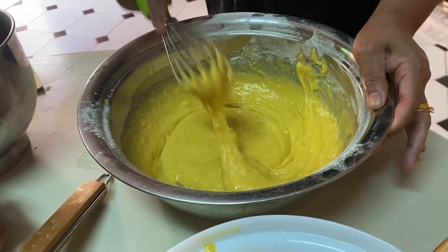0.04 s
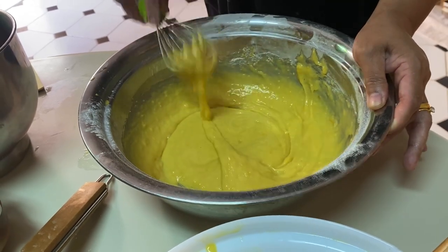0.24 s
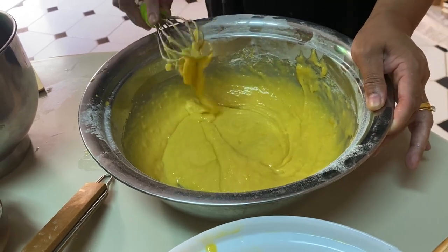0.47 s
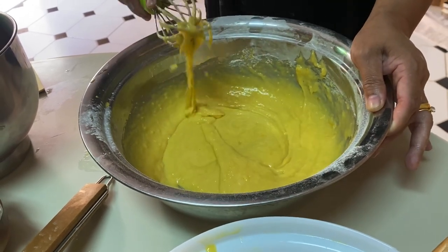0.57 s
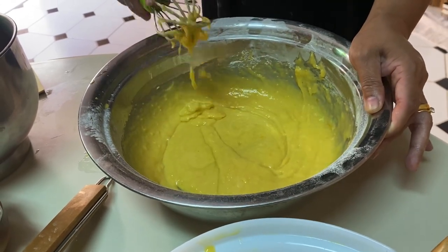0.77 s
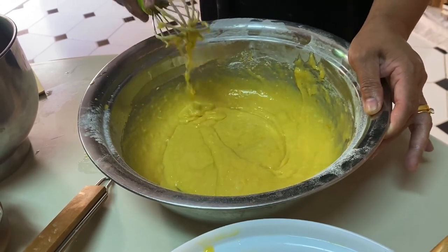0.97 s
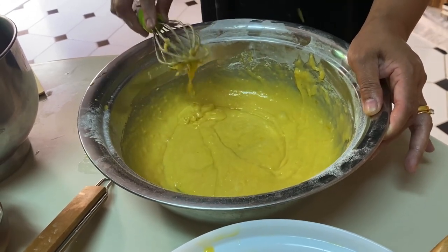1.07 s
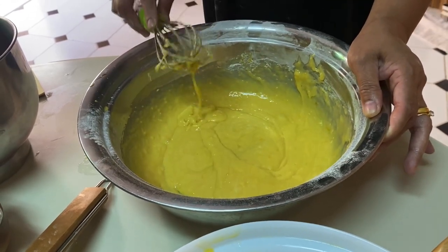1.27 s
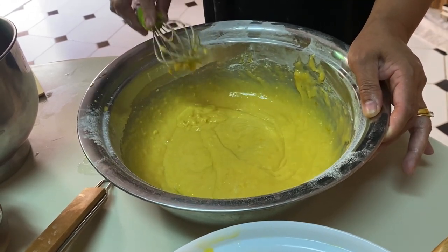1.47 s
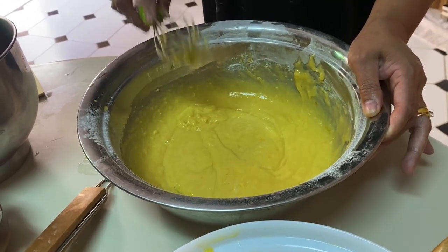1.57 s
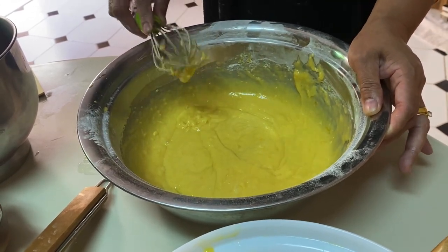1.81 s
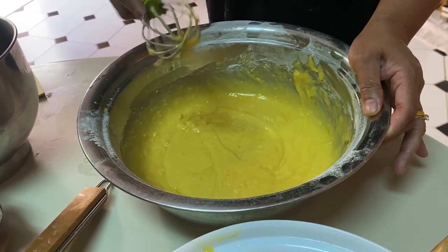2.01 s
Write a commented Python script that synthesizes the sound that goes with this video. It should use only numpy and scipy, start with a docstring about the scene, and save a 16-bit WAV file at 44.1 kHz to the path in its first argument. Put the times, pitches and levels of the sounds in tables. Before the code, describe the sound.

A wire whisk taps nine times on a steel mixing bowl's rim, evenly, in a kitchen

```python
"""A quiet hum, coloured noise, is heard first; then a wire whisk is tapped nine times on the rim of a steel
mixing bowl to shake off batter. Each tap is a short chatter of wires, made of decaying noise bursts, over a
longer noise wash of rattling wires. It rings the damped bowl and thumps the worktop, both sums of decaying
modes, and a hard kitchen answers by convolution with a noise tail whose decay depends on frequency."""
import sys
import numpy as np
from scipy import signal
from scipy.fft import rfft, irfft, next_fast_len
from scipy.io import wavfile

SR = 44100
rng = np.random.default_rng(int(sys.argv[2]) if len(sys.argv) > 2 else 0)


def log_audio(samples):
    """Write samples as a 16-bit WAV file to the path given in sys.argv[1]."""
    # one column per channel
    frames = np.atleast_2d(samples).T
    # limit to full scale, then quantise
    limited = np.clip(frames, -1, 1)
    pcm = np.round(limited * 32767).astype(np.int16)
    wavfile.write(sys.argv[1], SR, pcm)


N = 90404

# Steady hum spectrum: (frequency [Hz], relative density [dB per Hz])
HUM_SPECTRUM = [(15, -42), (25, -38), (48, -7), (144, -14), (177, -3), (344, -22.5), (584, -15), (666, -25),
                (741, -19), (1440, -28.5), (4850, -39), (8930, -48), (14000, -49)]
HUM_DB = -57.5

# Taps: (time [s], chatter level [dB], worktop thump level [dB], worktop knock level [dB], bowl body level [dB],
# rim levels near 3, 4, 5 and 7 kHz [dB], four columns, added left-over-right level [dB])
TAPS = [(0.1993, -13.5, -23, -30, -24, -26, -25.5, -34, -25, 0.53),
        (0.389, -15.5, -24, -29.5, -25, -22.5, -28.5, -49, -51, 0.71),
        (0.5786, -15, -23.5, -27.5, -23.5, -24.5, -31, -37, -25.5, 0.66),
        (0.7795, -19.5, -22, -23, -20, -20, -27, -33, -20, 0.77),
        (0.9749, -17, -24, -24.5, -21, -21, -24.5, -34, -30, 1),
        (1.17, -21, -23, -28.5, -19, -18, -20, -27, -33, 0.92),
        (1.3519, -15.5, -25, -29.5, -24.5, -21.5, -27, -39, -30, 0.82),
        (1.5473, -18, -22.5, -28, -19, -21, -27, -26, -36, 1.2),
        (1.7214, -17, -23, -29, -23.5, -17, -23, -34.5, -20, 0.75)]

# Wires landing on the rim: (frequency [Hz], relative density [dB per Hz])
CHATTER_SPECTRUM = [(500, -37), (1500, -16), (2100, -11), (3400, -18), (4500, -17), (5500, -4), (6500, -10),
                    (8000, -7), (12000, -7.5), (15000, 0.5), (16300, -17.5), (17300, -37)]
CHATTER_RISE_S, CHATTER_HOLD_S, CHATTER_T60_S = 0.00047, 0.0055, 0.032
WIRES, WIRE_T60_S = 7, 0.0048  # landings in a tap, decay of each
WIRE_SCATTER_DB = 6.5  # landings lie between zero and twice this below full level

# Wires rattling on: (frequency [Hz], relative density [dB per Hz])
QUIVER_SPECTRUM = [(600, -21), (1200, 0), (2000, 1.5), (2700, -3), (3400, -2), (4500, -2.5), (6300, -3),
                   (8500, -8.5), (12000, -9), (17000, -31)]
QUIVER_DB, QUIVER_T60_S, QUIVER_RISE_S = -18, 0.42, 0.0021  # level relative to the chatter

# Modes of the bowl's rim near 3, 4, 5 and 7 kHz, then of its body:
# (frequency [Hz], relative level [dB], 60 dB decay time [s], first swing [1 or -1])
RIM_3K = [(2275, -17, .15, 1), (2390, -8, .035, -1), (2995, 0, .04, 1), (2980, -21, .6, -1)]
RIM_4K = [(3826, -2, 0.051, -1), (3822, 2.5, 0.018, 1), (3820, -13, 0.15, -1), (4336, -17.5, 0.029, 1)]
RIM_5K = [(4840, -2.5, 0.096, -1), (4815, -11, 0.39, 1), (5650, -5.5, 0.069, 1), (5610, -11.5, 0.047, -1)]
RIM_7K = [(6300, -6, .03, -1), (7040, 2, .028, 1), (7600, -6, .025, -1), (7950, -8, .025, 1)]
BODY = [(904, -3.5, 0.052, 1), (1048.5, 2.5, 0.036, -1), (1220.6, -14.5, 0.34, 1), (1403, 8.5, 0.02, -1),
        (1540, -3.5, 0.067, 1), (1990, -46, 0.045, -1)]
RIM_LAG_S, BODY_LAG_S = 0.000875, 0.001585
BOWL_RISE_S = 0.00046  # the bowl swells while the wires land
BLUR_HZ = 17.3  # batter and the hand blur the bowl's modes
BOWL_WET_DB = -2.5  # the bowl's ring reaches the walls weaker than the chatter

# Modes of the worktop: knock, then thump, then low boom, each listed from low to high:
# (frequency [Hz], relative level [dB], 60 dB decay time [s], first swing [1 or -1])
KNOCK = [(276.4, -4, 0.21, 1), (324.2, 10.5, 0.066, -1), (451, 15.5, 0.023, -1), (505.5, -9.5, 0.16, -1),
         (541, -0.5, 0.22, 1), (620, 9, 0.041, -1), (804.7, -3, 0.043, 1)]
THUMP = [(116.3, -12, 0.52, 1), (133.6, -1, .1, 1), (171.6, -11, 0.31, 1), (198.6, -5.5, 0.21, 1),
         (247.5, -1, 0.12, -1)]
BOOM = [(48.7, -12.5, 0.72, 1), (64.1, -7, 0.32, 1), (76.7, -8.5, 0.24, -1)]
KNOCK_LAG_S, THUMP_LAG_S, BOOM_LAG_S = 0.00525, 0.00545, 0.012  # the push takes time to reach the worktop

SCATTER_DB = 1.5  # standard deviation of mode levels from tap to tap
RISE_CYCLES = 0.45  # each mode's build-up time constant, in its own cycles

# Reverberation: (frequency [Hz], 60 dB decay time [s])
ROOM_T60 = [(100, 0.55), (300, 0.52), (800, 0.56), (2000, 0.72), (5000, 0.6), (9000, 0.41), (14000, 0.3)]
# Reverberation strength: (frequency [Hz], tail over direct level [dB])
ROOM_LEVEL = [(60, -26), (200, -9.5), (600, -4), (1500, -3.5), (3000, -7.5), (6000, -4.5), (10000, -11.5),
              (16000, -14)]
ROOM_DELAY_S = 0.004

# Likeness of left and right: (frequency [Hz], correlation [0 to 1])
ALIKE = [(60, 1), (300, 0.81), (700, 0.17), (1400, .15), (3000, 0.81), (6000, 0.13), (8000, 1),
         (15000, 0.93)]
# Phase between left and right: (frequency [Hz], left lead [rad])
LEFT_LEADS = [(100, 0), (6850, 0), (9000, -3.14), (11000, -6.1), (13300, -9.42), (15500, -12.6),
              (17300, -15.2)]
# Level between left and right: (frequency [Hz], left over right level [dB])
LEFT_LEVEL = [(100, -1.5), (400, -1.1), (700, 1.5), (1500, 0.7), (2300, 1.5), (3000, 6.5), (3900, 2),
              (6000, -1.7), (16000, -0.5)]
TOP_HZ = 17350


def amp(db):
    """Level law: every 20 dB is a tenfold gain."""
    return 10 ** (np.asarray(db) / 20)


def along(points, hz):
    """Interpolation of (frequency, value) points on a logarithmic frequency axis."""
    f, v = np.transpose(points)
    return np.interp(np.log(hz + 1), np.log(f + 1), v)


def filtered(x, response):
    """Linear filtering: the spectrum is multiplied by a complex frequency response."""
    m = next_fast_len(x.shape[-1] + 8192)
    spectrum = rfft(x, m) * response(np.fft.rfftfreq(m, 1 / SR))
    return irfft(spectrum, m)[..., :x.shape[-1]]


def coloured(spectrum, size):
    """Spectral shaping of white noise: two unrelated signals with a joint rms of 1."""
    white = rng.standard_normal((2, size))
    x = filtered(white, lambda hz: amp(along(spectrum, hz)))
    return x / np.sqrt(np.mean(x ** 2))


def stereo(pair):
    """Stereo width: mixing two unrelated versions sets how alike left and right are in each band."""
    def mix(hz):
        turn = np.arccos(np.clip(along(ALIKE, hz), 0, 1)) / 2
        return np.array([np.cos(turn), np.sin(turn)])

    def tilt(hz):
        half_level = amp(along(LEFT_LEVEL, hz) / 2)
        half_lead = np.exp(0.5j * along(LEFT_LEADS, hz))
        return half_level * half_lead

    shared, opposed = filtered(pair, mix)
    left_right = np.array([shared + opposed, shared - opposed])
    return filtered(left_right, lambda hz: np.array([tilt(hz), 1 / tilt(hz)]))


def hum():
    """Stationary noise: a fixed spectrum at a constant low level."""
    return amp(HUM_DB) * stereo(coloured(HUM_SPECTRUM, size=N))


def chatter(t):
    """Impact succession: the wires land one after another within a few milliseconds, each a decaying burst."""
    draw = rng.random((WIRES, 2))
    landing = CHATTER_HOLD_S * (np.arange(WIRES)[:, None] + draw[:, :1]) / WIRES
    age = t - landing
    strength_db = WIRE_SCATTER_DB * 2 * (draw[:, 1:] - 1)
    ticks = amp(strength_db - 60 * np.abs(age) / WIRE_T60_S) * (age > 0)
    wash = amp(-9 - 60 * t / CHATTER_T60_S)
    rise = 1 - np.exp(-t / CHATTER_RISE_S)
    return rise * (ticks.sum(0) + wash) * coloured(CHATTER_SPECTRUM, size=len(t))


def quiver(t):
    """Dense collisions: wires rattling against each other merge into exponentially decaying noise."""
    decay = amp(QUIVER_DB - 60 * t / QUIVER_T60_S)
    rise = 1 - np.exp(-t / QUIVER_RISE_S)
    return decay * rise * coloured(QUIVER_SPECTRUM, size=len(t))


def ring(modes, age, loose, blur_hz=0, rise_s=0):
    """Modal superposition: modes struck together decay separately; a second version is a quarter cycle away.

    loose is the span of random starting phase in cycles; a random phase walk widens each mode by blur_hz."""
    hz, db, t60, swing = np.transpose(modes)[..., None]
    size = np.sign(swing) * amp(db + SCATTER_DB * rng.standard_normal(hz.shape))
    rise = 1 - np.exp(-age / (RISE_CYCLES / hz + rise_s))
    shape = size * amp(-60 * age / t60) * rise
    steps = rng.standard_normal(shape.shape)
    drift = np.cumsum(steps, axis=1) * np.sqrt(2 * np.pi * blur_hz / SR)
    phase = 2 * np.pi * (hz * age + loose * (rng.random(hz.shape) - 0.5)) + drift
    side = rng.choice([-1, 1], hz.shape)
    first = np.sum(shape * np.sin(phase), axis=0)
    second = np.sum(side * shape * np.cos(phase), axis=0)
    return np.array([first, second])


def since(t, lag):
    """Propagation delay: time counted from a late arrival, zero before it."""
    return np.maximum(t - lag, 0)


def bowl(t, body_db, rim_db):
    """Damped shell vibration: the rim's modes answer first, then the lower modes of the body."""
    out = np.zeros((2, len(t)))
    for modes, db in zip([RIM_3K, RIM_4K, RIM_5K, RIM_7K], rim_db):
        out += amp(db) * ring(modes, since(t, RIM_LAG_S), 0.85, BLUR_HZ, BOWL_RISE_S)
    return out + amp(body_db) * ring(BODY, since(t, BODY_LAG_S), 0.22, BLUR_HZ, BOWL_RISE_S)


def kitchen(x):
    """Reverberation: a fresh noise tail for each tap, in which each frequency dies at its own speed."""
    hz, t, z = signal.stft(rng.standard_normal(x.shape), SR, nperseg=256)
    t60 = along(ROOM_T60, hz)[:, None]
    decaying = z * amp(-60 * t / t60) / np.sqrt(t60)  # the root evens out energy between decay times
    tail = signal.istft(decaying, SR, nperseg=256)[1]
    tail = tail / np.linalg.norm(tail[0])
    tail = np.pad(tail, ((0, 0), (round(ROOM_DELAY_S * SR), 0)))
    tail = filtered(tail, lambda f: amp(along(ROOM_LEVEL, f)))
    return signal.fftconvolve(x, tail, axes=1)[:, :x.shape[1]]


def worktop(t, thump_db, knock_db):
    """Structure-borne excitation: the push arrives late and sets off a knock, a thump and a low boom."""
    knock = ring(KNOCK, since(t, KNOCK_LAG_S), 0.12)
    thump = ring(THUMP, since(t, THUMP_LAG_S), 0)
    boom = ring(BOOM, since(t, BOOM_LAG_S), 0)
    return amp(knock_db) * knock + amp(thump_db) * (thump + boom)


def taps():
    """Superposition: each tap adds wires, bowl and worktop to the room's answer."""
    out, t = np.zeros((2, N + SR)), np.arange(SR // 2) / SR
    for start_s, chatter_db, thump_db, knock_db, body_db, *rim_db, pan_db in TAPS:
        wires = amp(chatter_db) * chatter(t)
        rattle = amp(chatter_db) * quiver(t)
        bowl_ring = bowl(t, body_db, rim_db)
        rest = wires + worktop(t, thump_db, knock_db)
        room = kitchen(rest + amp(BOWL_WET_DB) * bowl_ring)
        pan = amp([[pan_db / 2], [-pan_db / 2]])
        start = round(start_s * SR)
        out[:, start:start + len(t)] += pan * stereo(rest + bowl_ring + room + rattle)
    return out[:, :N]


def scene():
    """Superposition: the taps sound over the hum."""
    return hum() + taps()


def record(dry):
    """Band limitation: nothing passes at or above the top frequency."""
    return filtered(dry, lambda hz: hz < TOP_HZ)


dry = scene()
out = record(dry)
log_audio(out)
```